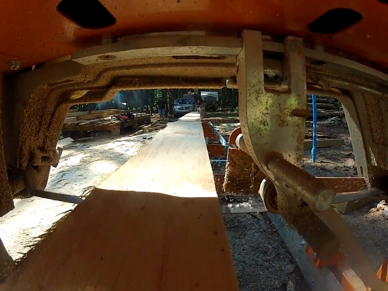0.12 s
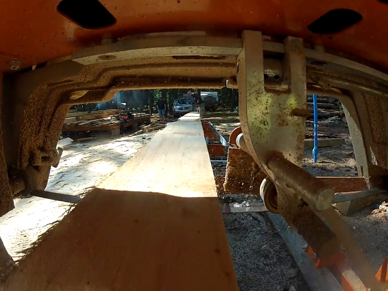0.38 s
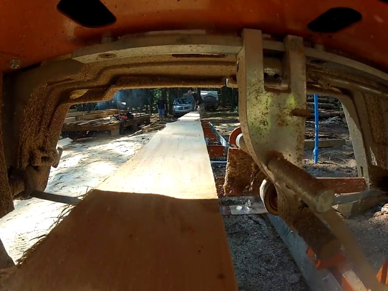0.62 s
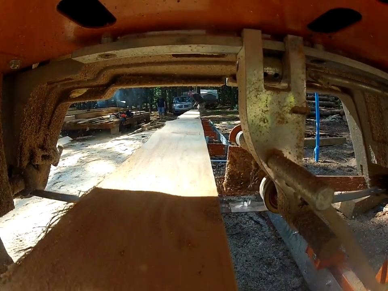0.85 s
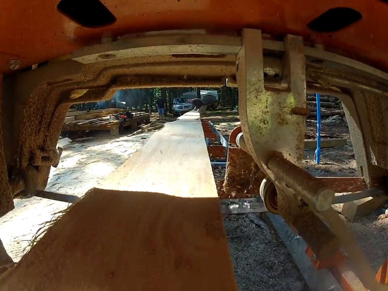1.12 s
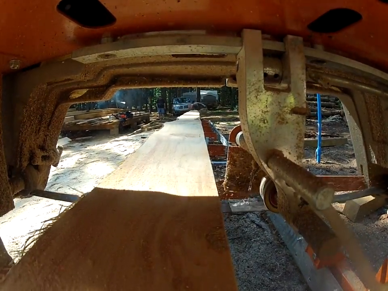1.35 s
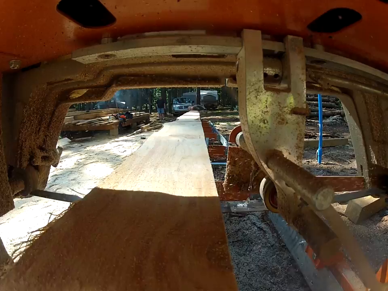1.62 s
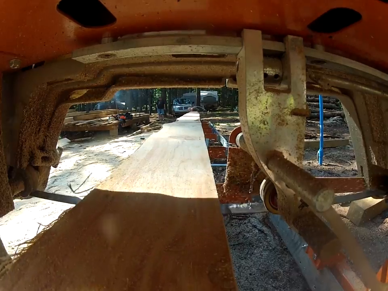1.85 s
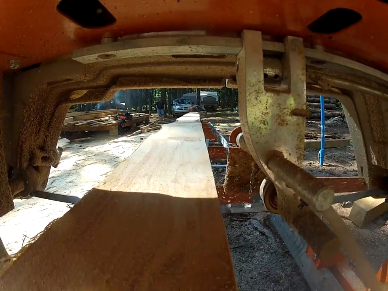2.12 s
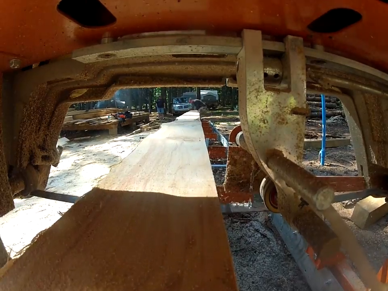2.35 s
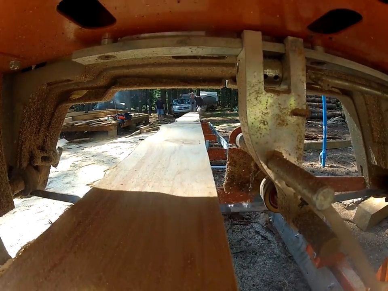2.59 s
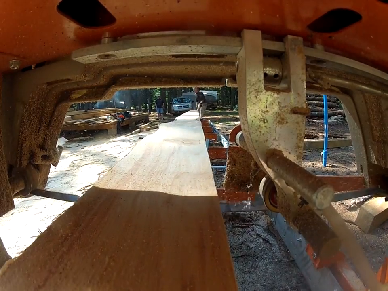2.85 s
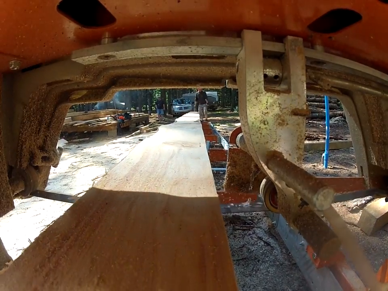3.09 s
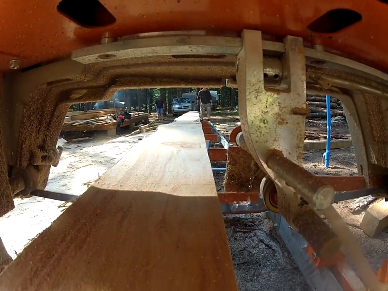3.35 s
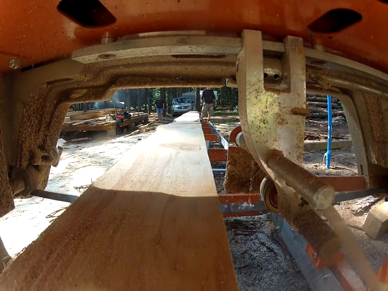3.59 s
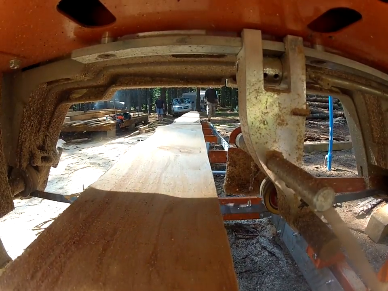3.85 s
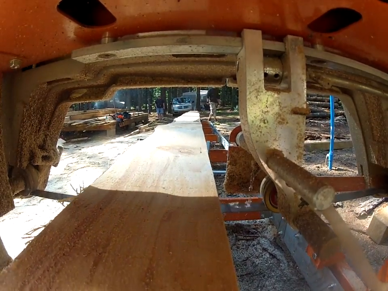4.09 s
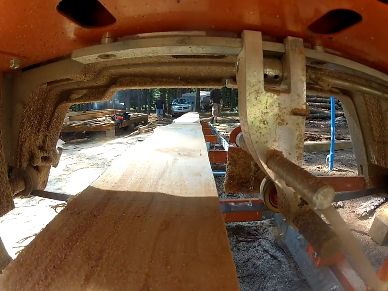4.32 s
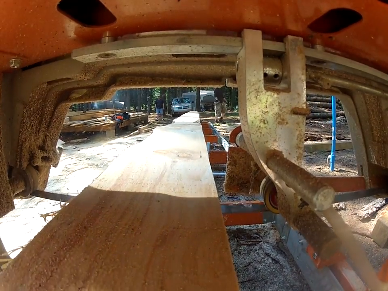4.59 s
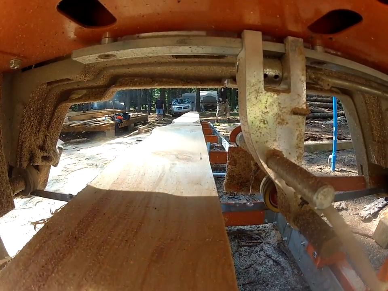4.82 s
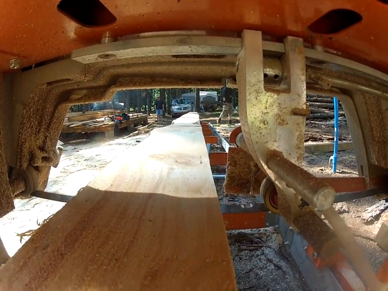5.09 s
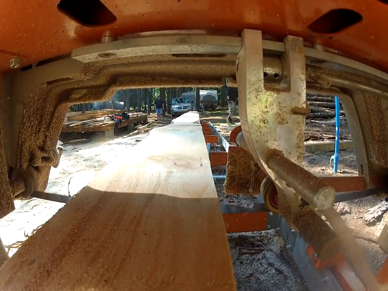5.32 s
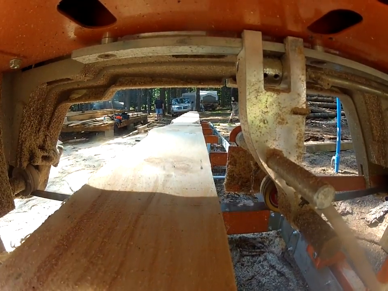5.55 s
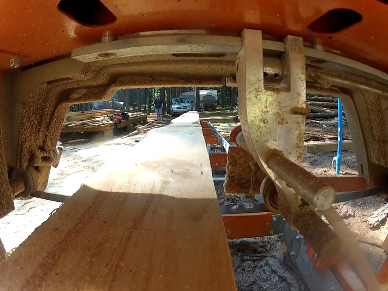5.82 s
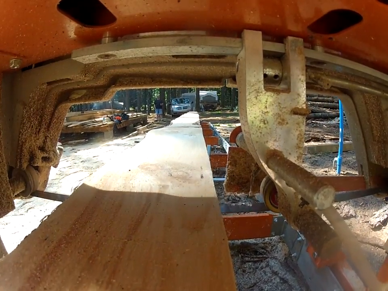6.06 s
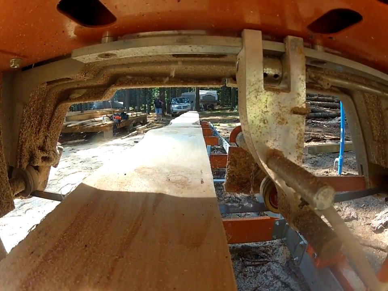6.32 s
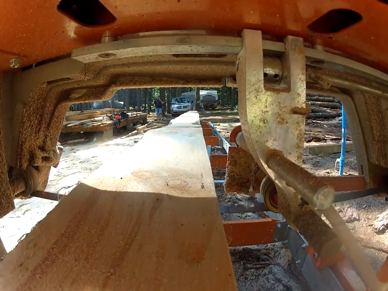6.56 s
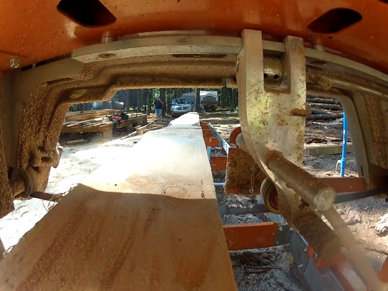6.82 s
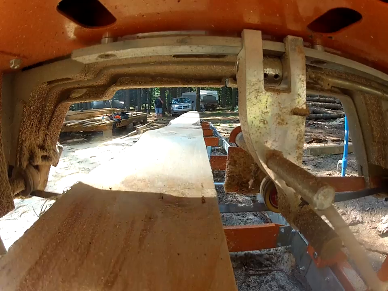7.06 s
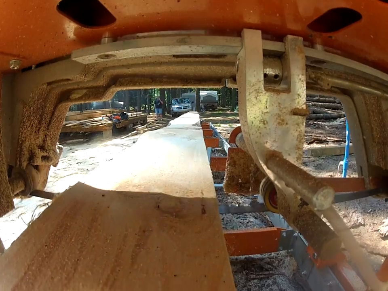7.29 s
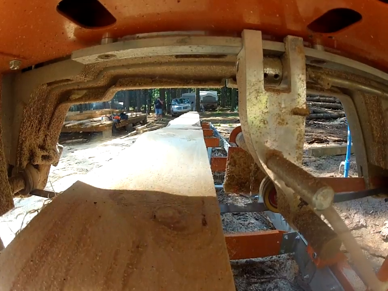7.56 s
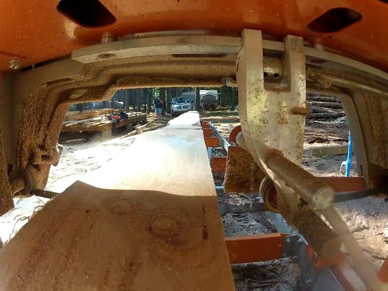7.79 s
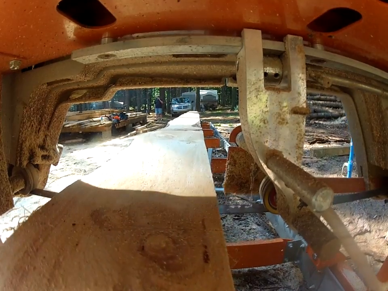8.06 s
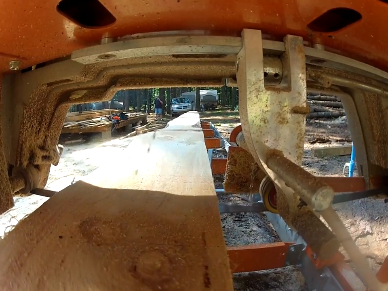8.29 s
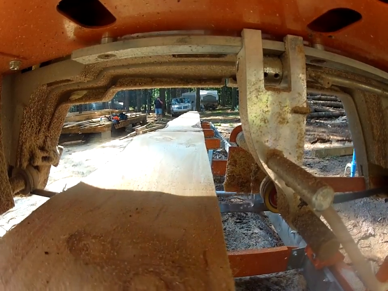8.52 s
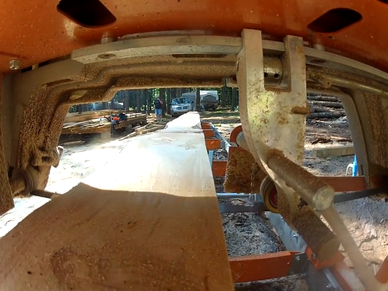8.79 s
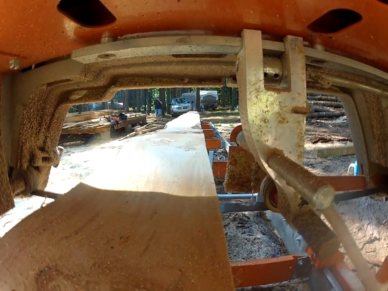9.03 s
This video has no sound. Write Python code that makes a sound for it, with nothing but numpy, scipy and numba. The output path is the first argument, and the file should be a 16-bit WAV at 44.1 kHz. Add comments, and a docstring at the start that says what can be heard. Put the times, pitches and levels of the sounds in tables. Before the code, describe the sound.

Close at the saw head, a petrol engine booms steadily at low pitch while a band blade hisses harshly through wood and loose metal rattles.

```python
"""A band sawmill cuts a log at steady throttle, heard at the saw head by the microphone of a small clamped-on camera.
The engine shakes the frame at twice crank speed; belt and band-wheel tones beat against that boom.
The blade hisses in the wood as filtered noise grains, and loose parts rattle in step with the shake.
Broad rumble and buzz lie beneath; the recorder limits the sound and holds each of its coarse samples."""
import sys
import numpy as np
from scipy import signal
from scipy.fft import rfft, irfft
from scipy.io import wavfile
from scipy.ndimage import uniform_filter1d
from numba import njit

SR = 44100
rng = np.random.default_rng(int(sys.argv[2]) if len(sys.argv) > 2 else 0)


def invert_db(x):
    """Field ratio 10**(x/20) for x, a level in decibels (scalar or array-like)."""
    u = np.asarray(x, float) / 20
    return 10 ** u


def generate_wav(signal):
    """Clip the signal to [-1, 1] and save it as 16-bit WAV at the path in sys.argv[1]."""
    frames = np.transpose(np.atleast_2d(signal))
    scaled = np.clip(frames, -1, 1) * 32767
    pcm = np.round(scaled).astype(np.int16)
    wavfile.write(sys.argv[1], SR, pcm)


N = 403956  # samples, about 9.16 s

# resonances of frame and housing: centre_hz, width_hz, blade_db (relative), struck_db (relative)
BODY_RINGS = [(687, 102, -14.5, -14), (961.5, 127, -4.5, -11.5), (1140, 208, -8.5, -15),
              (1281, 114, -0.5, -3.5), (1743, 273, -2.5, -4), (1990, 176, -6, -7.5), (2230, 212, -0.5, 2),
              (2503, 377, -9, -11), (3152, 306, -12.5, -1), (3492, 220, -8, 4), (3840, 300, -15.5, -3.5),
              (4430, 310, -15.5, -9), (5215, 590, -22.5, -27.5), (5806, 58, -25.5, -27)]
# placed strikes of the rattle: start_s, force_db (relative), lower_db (lower ring against upper)
HARD_STRIKES = [(0.2487, 3, -7), (0.4493, 4, -2), (0.5158, -3.5, 1), (0.615, -1, -1), (0.6494, -3, 2),
                (0.7085, -5, 7), (0.7163, -1.5, -8), (0.7492, 1.5, -10), (0.848, 2, 3), (0.9165, -2, 3),
                (1.051, 1.5, 1), (1.2193, -4, -2), (1.586, -4, 4), (1.949, 1, -5), (2.2479, 2.5, -3),
                (2.5162, 4.5, 3.5), (2.5495, -2.5, 3), (2.6496, 2, -3), (2.7175, -4, -5), (2.7505, -2, 3),
                (2.9204, 5, -5), (3.0205, -8, 5), (3.3199, -9, -6), (3.7434, -7, -3), (3.9835, 8, -8),
                (4.2502, 2, -1), (4.3814, -0.5, 2), (4.6935, 0, 0), (5.0696, 5, -4), (5.3676, -2, -6),
                (5.6085, 1, -4), (5.91, 4, -3), (5.9693, -1, 2), (6.6154, 3, -7), (6.8074, -3.5, -1),
                (7.163, -1, -3), (7.3652, 0, -7), (7.8353, -1, 0), (7.9703, 3, -5), (8.0036, -1, -8),
                (8.0712, -4, 0), (8.2385, -5.5, 3), (8.4405, -5, 2), (8.4745, -7, 5), (9.0798, 0, 2)]


def scale_to_rms(x, db):
    """Scale to an rms level in dB."""
    return x * invert_db(db) / np.sqrt(np.mean(x ** 2))


def curve(table):
    """Columns of a time table, drawn as straight lines sample by sample."""
    start_s, *columns = np.transpose(table)
    return [np.interp(np.arange(N) / SR, start_s, column) for column in columns]


def walk(rate_hz):
    """Random levels held for 1 / rate_hz seconds and smoothed twice; spread near 1."""
    held = int(SR / rate_hz)
    steps = np.repeat(rng.standard_normal(N // held + 1), held)
    return 1.02 * uniform_filter1d(uniform_filter1d(steps, held), held)[:N]


def ring(x, hz, width_hz):
    """A resonance of gain 1 at its centre, applied twice so that the valleys stay dark."""
    b, a = signal.iirpeak(hz, hz / width_hz / 1.48, fs=SR)  # each pass is wider than the pair
    return signal.lfilter(b, a, signal.lfilter(b, a, x))


def tone(cycles):
    """A sine wave of rms 1 from its running count of cycles."""
    return np.sqrt(2) * np.cos(2 * np.pi * cycles)


def crank():
    """Crank turns so far: the governor hunts a little, then sags under the deeper cut and recovers."""
    # crank speed: start_s, speed_turns_per_s
    crank_speed = [(0.0, 60.127), (1.15, 59.817), (1.65, 60.414), (2.6, 59.483), (3.2, 59.974),
                   (4.5, 60.555), (5.6, 59.904), (7.1, 59.27), (9.16, 59.842)]
    return -0.25 + np.cumsum(curve(crank_speed)[0]) / SR


def jolts():
    """Boom change in dB: it swells around most placed strikes, then dips as the limiter turns down after a loud one."""
    t = np.arange(N) / SR
    change_db = np.zeros(N)
    for at, force_db, _ in HARD_STRIKES:
        near = slice(max(int((at - 0.06) * SR), 0), int((at + 0.07) * SR))
        after_s = t[near] - at
        swells = 0.43 * np.exp(-((after_s + 0.005) / 0.0064) ** 2)
        dips = 0.32 * np.exp(-((after_s - 0.02) / 0.015) ** 2)
        change_db[near] += (force_db + 7.5) * (swells - dips)  # below -7.5 dB the change is reversed
    return change_db


def engine(turns, boom_db):
    """Firing shakes the frame: a wavering boom at twice crank speed with weaker orders around it."""
    # tone at two and a half times crank speed: start_s, level_db (rms, before wavering)
    # faint at first, swelling twice late on, near 7.1 s and again from 8.5 s
    lump_level = [(0.0, -48), (6.7, -49), (7.1, -27), (7.85, -45), (8.5, -27), (9.16, -33)]
    # weaker engine tones: crank_multiple, level_db (rms, before wavering)
    engine_orders = [(.5, -50), (1, -39), (1.5, -37), (3, -39), (3.5, -36), (4, -36.5), (4.5, -43.5),
                     (5.5, -45), (6, -49), (7, -48.5)]
    lump_db = curve(lump_level)[0]
    out = invert_db(boom_db + 0.67 * walk(9)) * tone(2 * turns)
    out += invert_db(lump_db + 3.3 * walk(4.4)) * tone(2.5 * turns + rng.random())
    for multiple, db in engine_orders:
        out += invert_db(db + 3.2 * walk(6)) * tone(multiple * turns + rng.random())
    return out


def drive(turns):
    """Belts and wheels turn at their own ratios and slip, so their tones swell, fade and beat with the boom."""
    # belt and band-wheel tones: crank_multiple, level_db (rms, before wavering)
    drive_tones = [(1.628, -29.5), (1.664, -28.5), (1.741, -28), (1.837, -38.5), (2.3259, -30),
                   (2.3724, -43)]
    out = np.zeros(N)
    for multiple, db in drive_tones:
        slip_cycles = rng.random() + 0.17 * walk(1.467)
        out += invert_db(db + 3.2 * walk(2.3)) * tone(multiple * turns + slip_cycles)
    return out


def blade(turns, shake):
    """Teeth tear the wood in dense uneven grains, harder once a crank turn and whenever the frame swings wide."""
    uneven_db = 2.65 * walk(300) + 1.26 * walk(30)
    turn_db = 1.13 * np.cos(2 * np.pi * (turns - 0.92))
    grains = rng.standard_normal(N) * invert_db(uneven_db + turn_db) * shake ** 0.72
    hiss = np.zeros(N)
    for k, (hz, width_hz, blade_db, _) in enumerate(BODY_RINGS):
        hiss += (-1) ** k * invert_db(blade_db) * ring(grains, hz, width_hz)  # neighbours alternate in sign
    return scale_to_rms(hiss, 0)


def scrape(length_s):
    """The envelope of a few milliseconds of chatter in one strike, with a quick rise."""
    t = np.arange(int(6 * length_s * SR)) / SR
    return 1.23 * np.exp(-t / length_s) * (1 - np.exp(-t / 0.00024))


def rattle(turns, shake, cut_db):
    """A loose part ticks and chatters once a shake, at the same point of the swing, harder when it swings wide."""
    # strike level on each of the four shakes of a four-stroke cycle: level_db (relative)
    shake_strike_db = [-4.5, 6.5, -1, -2]
    beat = np.floor(2 * (turns - 0.23))
    at = np.flatnonzero(np.diff(beat) > 0)
    chance = rng.standard_normal((len(at), 2))
    size_db = np.take(shake_strike_db, beat[at + 1].astype(int) % 4)
    size_db = size_db + 4.0 * chance[:, 0] + cut_db[at] + 14.0

    upper, lower = np.zeros(N), np.zeros(N)
    upper[at] = np.minimum(invert_db(size_db) * shake[at] ** 0.86, invert_db(-8.0))
    lower[at] = upper[at] * invert_db(1.5 + 3.3 * chance[:, 1])
    start_s, force_db, lower_db = np.transpose(HARD_STRIKES)
    hard = (start_s * SR).astype(int)
    upper[hard] = invert_db(force_db)
    lower[hard] = invert_db(force_db + lower_db)

    # each strike is a burst of random-sign chatter plus a bare tick
    chatter = np.sign(rng.standard_normal(N))
    upper_chatter = signal.oaconvolve(upper, scrape(0.001))[:N] * chatter
    lower_chatter = signal.oaconvolve(lower, scrape(0.002))[:N] * chatter
    upper = 0.94 * upper_chatter + 3.96 * upper
    lower = 1.08 * lower_chatter + 5.3 * lower
    out = np.zeros(N)
    for k, (hz, width_hz, _, struck_db) in enumerate(BODY_RINGS):
        struck = upper if hz > 2800 else lower
        out += (-1) ** k * invert_db(struck_db) * ring(struck, hz, width_hz)
    return out


def rumble():
    """Noise shaking the frame, strongest at its resonance just under the boom; split into deep part and buzz."""
    # spectrum of the frame's rumble: pitch_hz, density_db (relative, per Hz)
    rumble_shape = [(15, -62), (25, -27.5), (54, -44), (89, -10.5), (118, -6.5), (143, -15.5), (173, -16),
                    (235, -21.5), (298, -26.5), (367, -21.5), (597, -33), (691, -42), (790, -46),
                    (850, -47), (1100, -73), (1870, -120)]
    buzz_from_hz = 210
    hz, db = np.transpose(rumble_shape)
    f = np.maximum(np.fft.rfftfreq(N, 1 / SR), 1)
    shape = invert_db(np.interp(np.log(f), np.log(hz), db, right=-90))
    noise = rng.standard_normal(N) * invert_db(2.0 * walk(60))
    shaped = irfft(rfft(noise) * shape, N)
    whole = rfft(scale_to_rms(shaped, -22.5))
    deep = 1 / (1 + (f / buzz_from_hz) ** 6)
    return irfft(whole * deep, N), irfft(whole * (1 - deep), N)


def scene():
    """Shake of the frame, with buzz, blade and rattle riding on it."""
    # levels of boom and cutting: start_s, boom_db, cutting_db
    # they often swell together, but late on the boom alone grows louder
    load = [(0.0, -15.5, -26.5), (.25, -12, -21.5), (.6, -14.5, -24.5), (1.05, -14, -24.5),
            (1.28, -12.5, -20.5), (1.65, -15, -22.5), (2.1, -11.5, -19.5), (2.35, -14, -23),
            (2.9, -15, -23), (3.7, -13, -21.5), (4.3, -14.5, -22), (5.4, -12.5, -21), (5.95, -12.5, -23),
            (6.3, -12, -20), (6.6, -12, -21), (7.65, -10.5, -20.5), (8.05, -10.5, -21), (8.9, -11, -21.5),
            (9.16, -12.5, -21)]
    turns = crank()
    boom_db, cut_db = curve(load)
    deep, buzz = rumble()
    low = engine(turns, boom_db + jolts()) + drive(turns) + deep

    # swing of the frame over one shake, relative to the present boom level
    swing = np.sqrt(uniform_filter1d(low ** 2, size=SR // 120) + 1e-9)
    shake = swing / (invert_db(boom_db) * 1.33)
    mix = low + buzz * np.minimum(shake, 1.4) ** 0.74  # a wide swing brings out the buzz
    mix += invert_db(cut_db) * blade(turns, shake)
    mix += rattle(turns, shake, cut_db)
    return mix[None]


@njit
def limit(x, top, attack, release, hold):
    """Gain drops fast on an overload, waits hold samples, then creeps back; attack and release are per sample."""
    out, envelope, wait = np.empty(len(x)), top, 0.
    for i in range(len(x)):
        out[i] = x[i] * top / envelope
        if abs(x[i]) > envelope:
            envelope += (abs(x[i]) - envelope) * attack
            wait = hold
        elif wait > 0:
            wait -= 1
        else:
            envelope += (top - envelope) * release
    return out


def top_cut(x):
    """Nothing passes above the cut-off."""
    return signal.sosfilt(signal.butter(12, 15780, fs=SR, output="sos"), x)


def record(dry):
    """A limiter and a hard ceiling; each coarse sample is held flat, which mirrors the sound around its rate."""
    coarse_hz, repeats = 12000, 4
    coarse = signal.resample(dry[0], N * coarse_hz // SR)
    # 28 ms release, 18 ms wait
    limited = limit(coarse, 0.61, 0.09, 1 / (0.028 * coarse_hz), 0.018 * coarse_hz)
    held = np.repeat(np.clip(limited, -0.72, 0.72), repeats)
    mix = signal.resample(held, N)[None]
    return top_cut(mix)


dry = scene()
out = record(dry)
generate_wav(out)
```